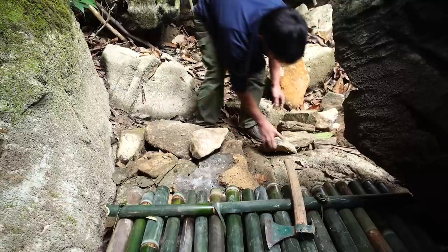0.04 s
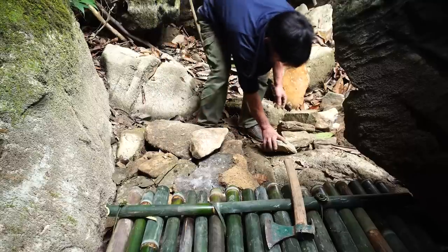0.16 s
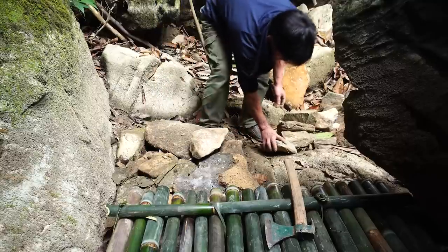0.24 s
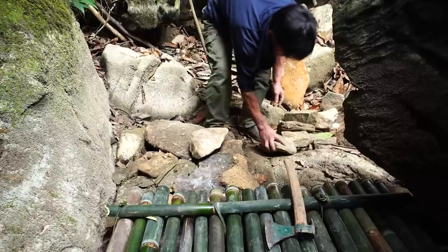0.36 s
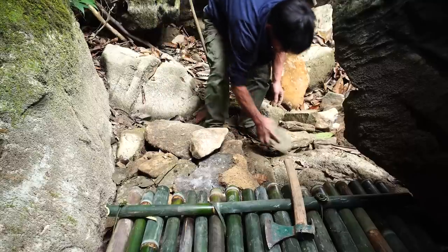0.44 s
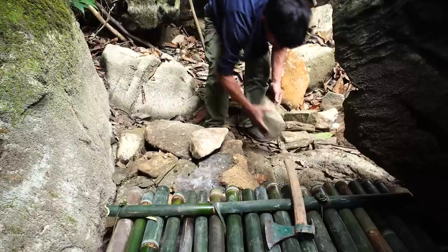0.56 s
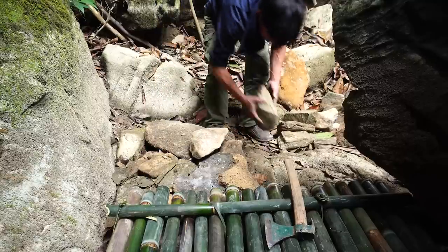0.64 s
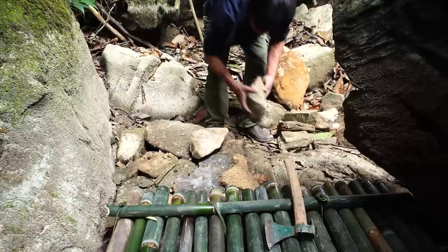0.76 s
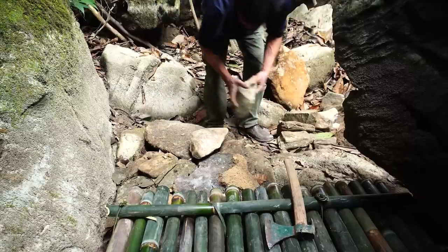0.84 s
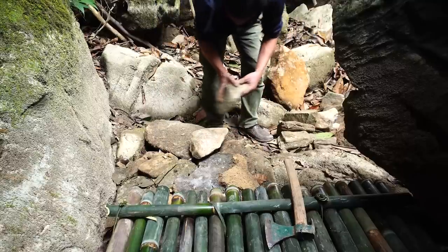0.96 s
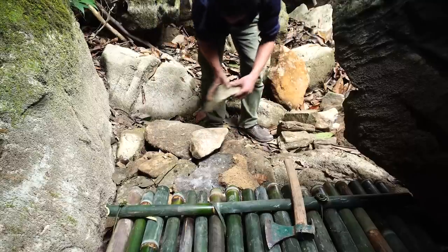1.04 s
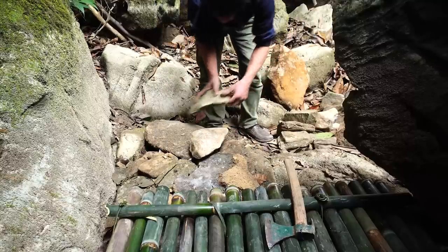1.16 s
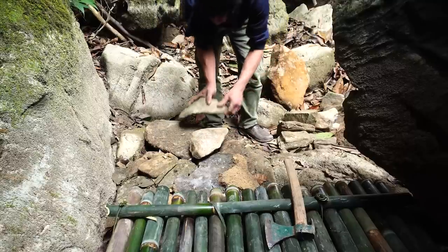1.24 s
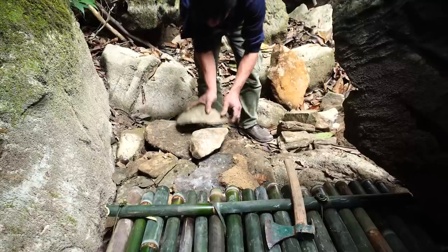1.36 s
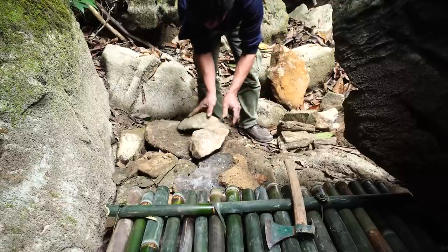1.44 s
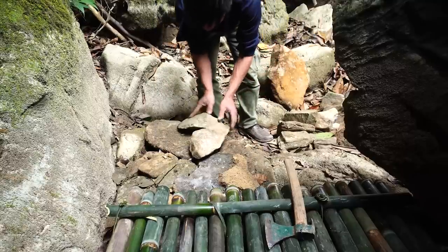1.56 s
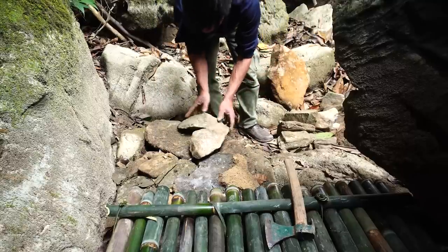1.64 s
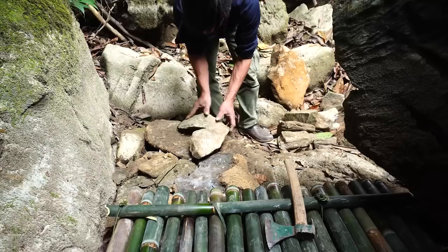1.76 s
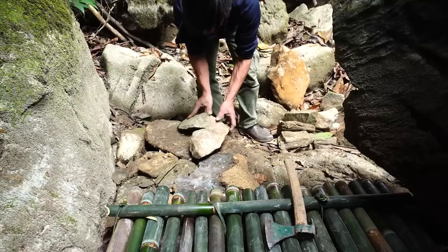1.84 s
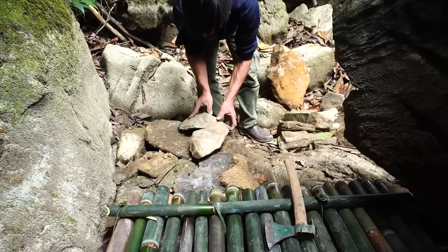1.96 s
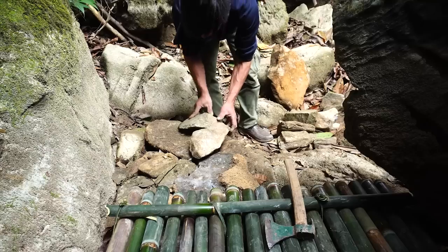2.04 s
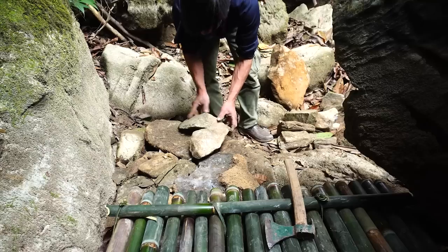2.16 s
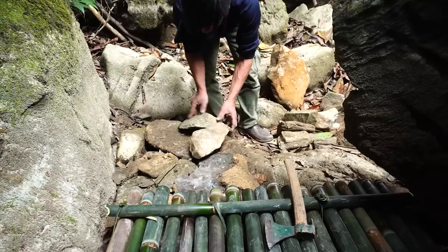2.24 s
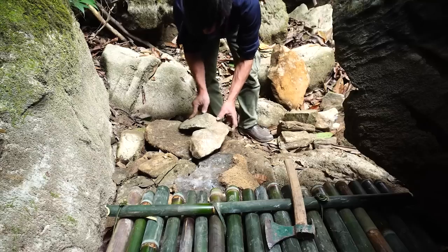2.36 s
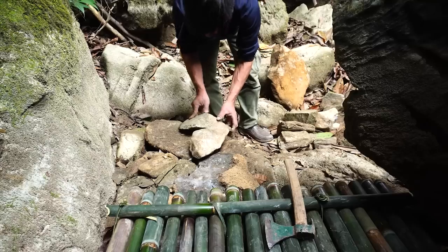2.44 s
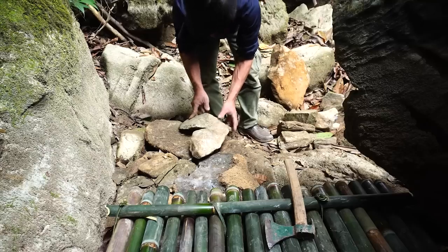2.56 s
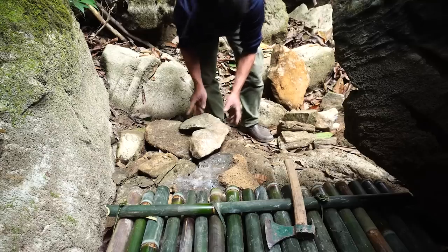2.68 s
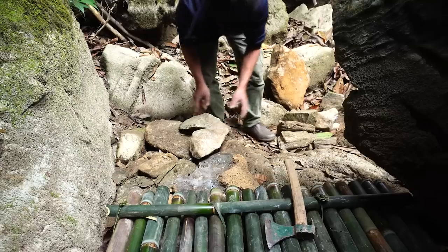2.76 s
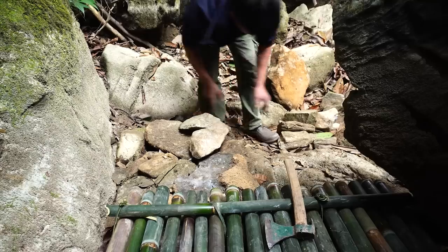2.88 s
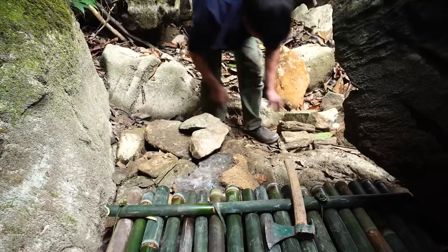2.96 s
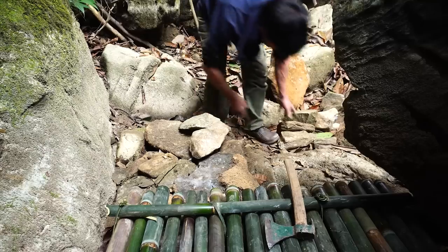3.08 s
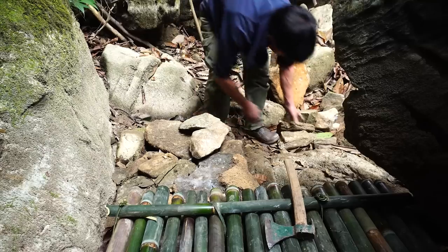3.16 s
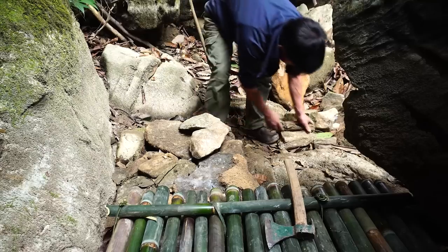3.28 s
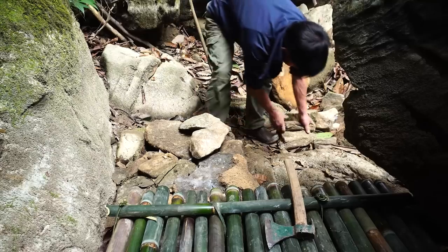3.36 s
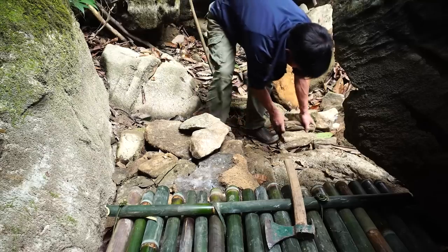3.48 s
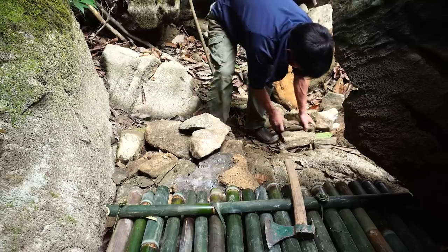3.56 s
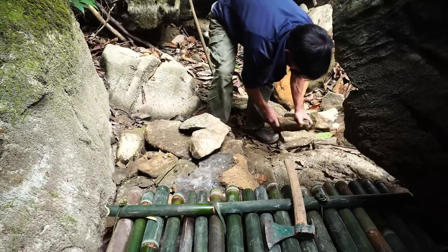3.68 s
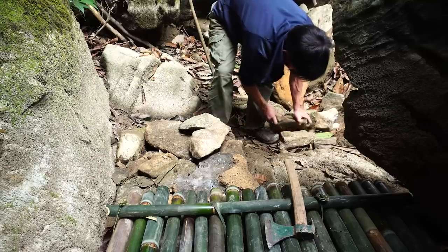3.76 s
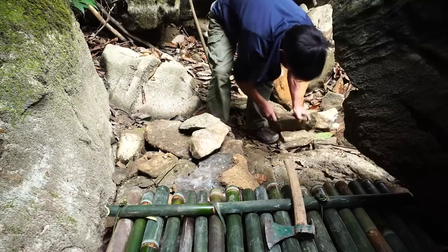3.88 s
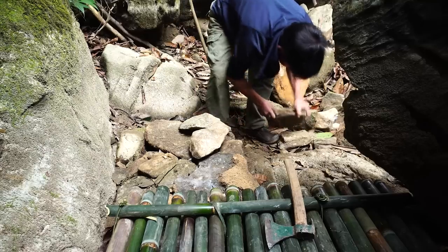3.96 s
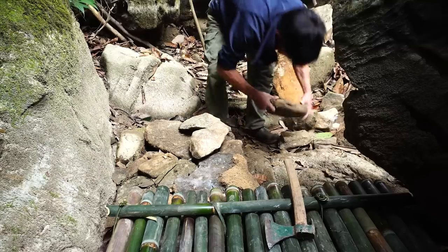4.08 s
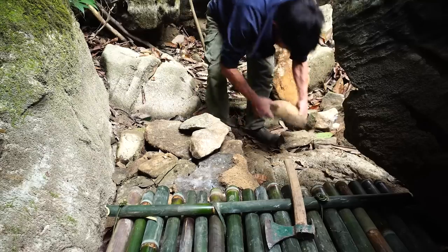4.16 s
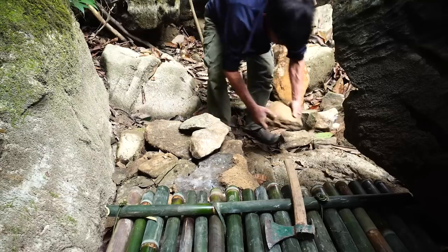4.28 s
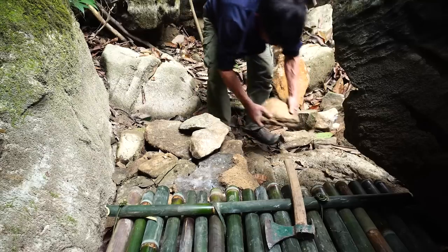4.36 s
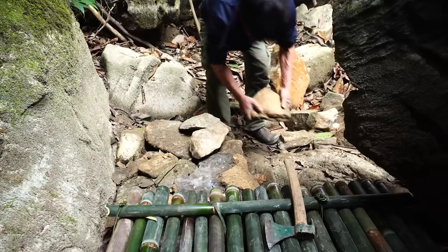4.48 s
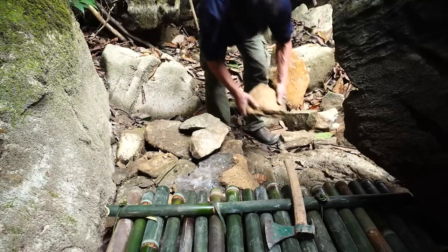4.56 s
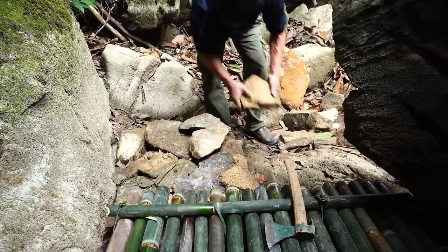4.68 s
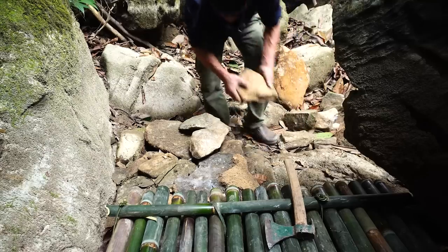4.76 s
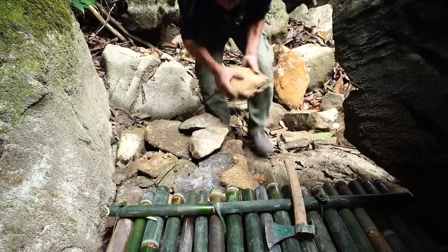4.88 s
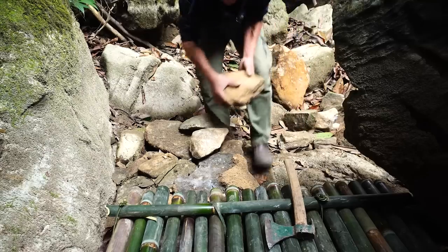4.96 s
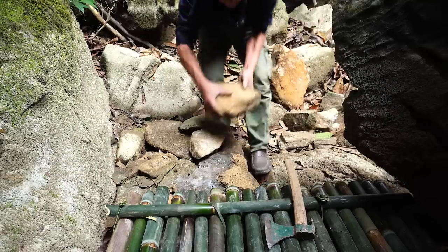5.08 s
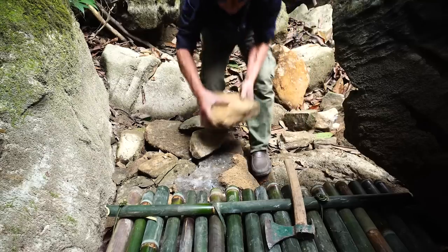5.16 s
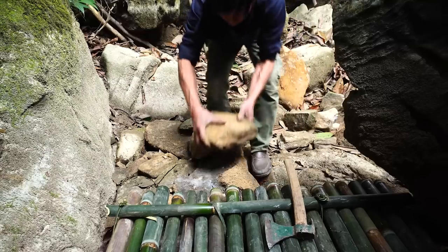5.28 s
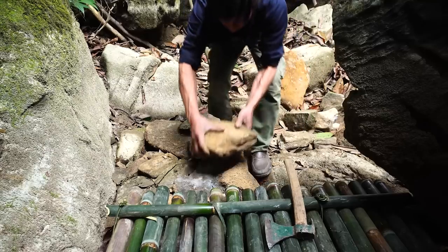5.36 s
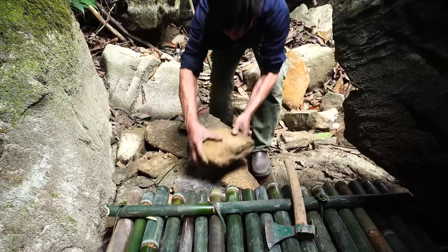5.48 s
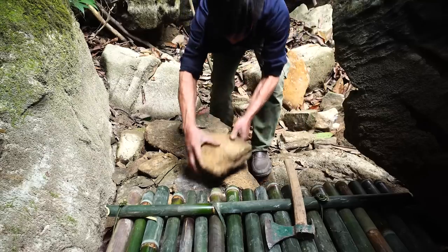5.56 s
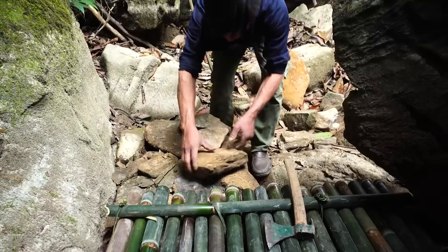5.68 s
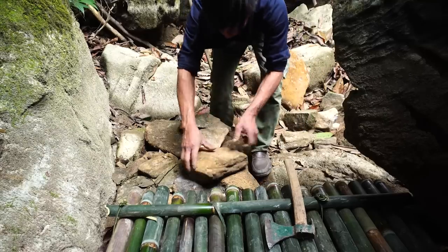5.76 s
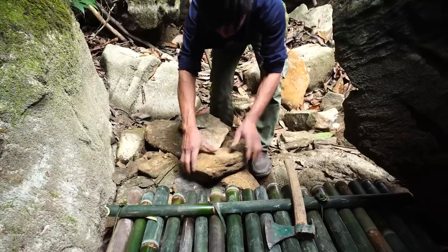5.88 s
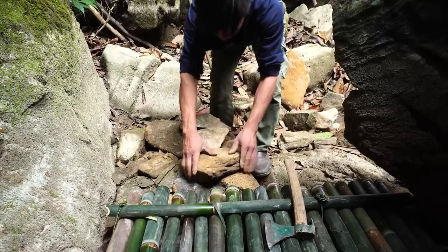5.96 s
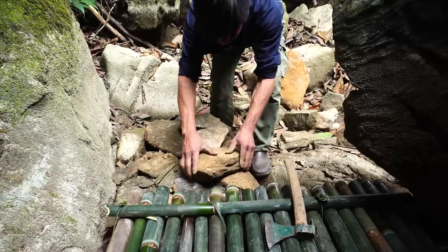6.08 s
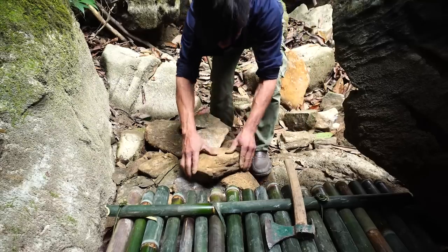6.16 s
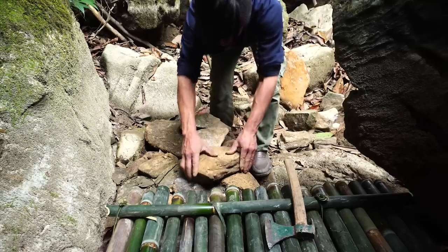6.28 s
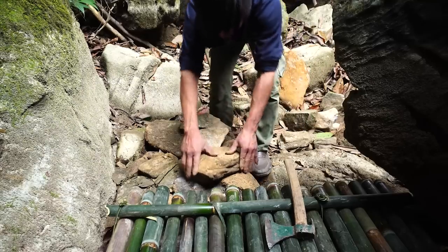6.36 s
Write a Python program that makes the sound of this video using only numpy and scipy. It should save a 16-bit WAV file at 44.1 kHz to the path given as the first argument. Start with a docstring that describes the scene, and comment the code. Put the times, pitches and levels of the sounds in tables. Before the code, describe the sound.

Cicadas buzz steadily in a forest while someone handles rocks, with light scrapes, a sharp knock and a louder clatter.

```python
"""Hands set loose stones down among boulders in a forest. From the start, cicadas drone by clicking
their tiny drums, over a soft forest hiss and feet shuffling in dead leaves. One more cicada joins in,
sweeping upward about every second and a half. Near 1.5 s cloth and leaves brush, grit snaps, and a
stone knocks, rings and thuds as it settles. Light taps and scrapes follow, and near 5.7 s comes the
loudest clatter of stones."""
import sys
import numpy as np
from scipy import signal
from scipy.fft import rfft, irfft, next_fast_len
from scipy.io import wavfile
from scipy.ndimage import uniform_filter1d

SR = 44100
rng = np.random.default_rng(int(sys.argv[2]) if len(sys.argv) > 2 else 0)


def transcribe(u):
    """Save the signal u as a 16-bit wav file named by the first command-line argument.

    u: samples, shape (n,) or (channels, n), limited to [-1, 1]; the rate is SR.
    q: integer samples, one column per channel.
    """
    v = np.clip(np.atleast_2d(u).T, -1, 1)
    q = np.round(v * 32767).astype(np.int16)
    wavfile.write(sys.argv[1], SR, q)


N = 283122


def amp(db):
    return 10 ** (np.asarray(db) / 20)

def unit_rms(x):
    return x / np.sqrt(np.mean(x ** 2) + 1e-20)

def value_at(table, hz):
    row_hz, value = np.transpose(table)
    return np.interp(np.log(hz + 1), np.log(row_hz + 1), value)

def add(mix, start_s, sound):
    part = mix[round(start_s * SR):][:len(sound)]
    part += sound[:len(part)]

def resonate(x, hz, width_hz):
    """Rings x at a steady or gliding pitch: shift that pitch to zero, smooth twice, shift back."""
    turn = np.exp(2j * np.pi * np.cumsum(hz * np.ones(len(x))) / SR)
    r = np.exp(-np.pi * width_hz / SR)
    return 2 * (turn * signal.lfilter([(1 - r) ** 2], [1, -2 * r, r * r], x / turn + 1e-18)).real

def wander(fastest_hz):
    """A slow random curve that strays about 1 either side of zero."""
    t = np.linspace(0, N / SR, 1000)
    waves = zip(np.geomspace(.2, fastest_hz, 12), rng.random(12))
    slow = sum(np.sin(2 * np.pi * (hz * t + phase)) / np.sqrt(hz) for hz, phase in waves)
    return unit_rms(np.interp(np.arange(N) / SR, t, slow))

# Each row: pitch in Hz, how alike left and right are (1 means the same).
LIKENESS = [(60, 0.47), (180, 0.92), (550, 0.048), (1650, 0.81), (4970, 0.17), (15000, 0.16)]
# Each row: pitch in Hz, how far the left wave runs ahead of the right in radians.
LEFT_LEAD = [(0, -0.83), (1380, 1.43), (4390, 0.6), (5770, 1.31), (8960, -1.45), (9730, -0.25),
             (15300, 0.41)]
# Each row: pitch in Hz, how much louder the left is than the right in dB.
LEFT_LOUDER = [(60, 1), (180, -1), (550, 0), (1650, -3.0), (4970, -3), (15000, -5.5)]
def noise(tone, patchy_db):
    """Wide stereo noise, shaped by a tone table, with patches that drift louder and softer."""
    hz = np.fft.rfftfreq(512, 1 / SR)
    a, b, c, d, patches = rng.standard_normal((N // 128 + 5, 257, 5)).T
    patches = unit_rms(uniform_filter1d(uniform_filter1d(patches, 6, 0), 20, 1))
    alike = np.clip(value_at(LIKENESS, hz), 0, 1)[:, None]
    left = a + 1j * b
    right = alike * left + np.sqrt(1 - alike ** 2) * (c + 1j * d)
    right *= np.exp(-1j * value_at(LEFT_LEAD, hz))[:, None]
    tilt = amp(value_at(LEFT_LOUDER, hz) / 2)[:, None]
    bands = np.array([left * tilt, right / tilt]) * amp(value_at(tone, hz)[:, None] + patchy_db * patches)
    return unit_rms(signal.istft(bands, nperseg=512, noverlap=384)[1][:, :N])

def echoes(x, fades):
    """Many small echoes. Each row of fades: pitch in Hz, fade time (seconds to fall 60 dB)."""
    taps = np.zeros((2, 16000))
    slots = np.arange(60, 15960, 20)
    at = slots + rng.integers(0, 20, (2, len(slots)))
    np.put_along_axis(taps, at, rng.choice([-1., 1.], at.shape), 1)
    taps = taps + 1.05 * taps[:1]  # near walls reach both sides alike
    hz, t, bands = signal.stft(taps, SR, nperseg=128)
    tail = signal.istft(bands * amp(-60 * t / value_at(fades, hz)[:, None]), SR, nperseg=128)[1]
    tail /= np.linalg.norm(tail, axis=1, keepdims=True)
    return signal.fftconvolve(x[None], tail, axes=1)[:, :N]

def placed(x, fades, echo_db, louder=LEFT_LOUDER, lead=LEFT_LEAD):
    """A sound and its echoes reach left and right at slightly different levels and times."""
    size = next_fast_len(N + 4096)
    hz, side = np.fft.rfftfreq(size, 1 / SR), np.array([[.5], [-.5]])
    sides = amp(side * value_at(louder, hz)) * np.exp(1j * side * value_at(lead, hz))
    return irfft(rfft(x + amp(echo_db) * echoes(x, fades), size) * sides, size)[:, :N]


# Each row: pitch in Hz, relative level in dB.
FOREST_TONE = [(20, -48), (100, -49), (300, -12), (800, -8), (1700, 1), (3500, -2.5), (7500, -9.5),
               (9000, -7.5), (12000, -12.5), (14000, -15), (15700, -19)]
def forest_hiss():
    """The far forest blends into a soft, even hiss."""
    return amp(-59) * noise(FOREST_TONE, patchy_db=1.2)

# The far crowd. Each row: pitch in Hz, relative level in dB.
CROWD_TONE = [(2350, -63), (4000, -21.5), (4360, -23.5), (4770, -11.5), (4890, -12.5), (5020, -4.5),
              (5540, 0.5), (5800, -10.5), (5840, 0), (6680, -14.5), (7000, -28.5), (7500, -21.5),
              (9750, -56), (16500, -120)]
# The near cicadas. Each row: drum pitch in Hz, width of its ring in Hz, level in dB.
NEAR_CICADAS = [(5444, 280, -52.5), (5626, 370, -47.5), (5920, 840, -54.5), (5227, 435, -52.5),
                (5550, 430, -62)]
# Each entry: clicks per second of one near cicada, in the same order.
CLICK_RATES = [63.62, 63.36, 97.66, 127.9, 228.7]
def cicadas():
    """Each drum buckles in quick clicks and rings; trees smear the song; the far crowd blurs to noise."""
    out = amp(-45.5 + .35 * wander(2.6)) * noise(CROWD_TONE, patchy_db=.9)
    for per_s, (hz, width_hz, db) in zip(CLICK_RATES, NEAR_CICADAS):
        count = np.cumsum(per_s * (1 + .0008 * wander(3))) / SR + rng.random()
        clicks = np.diff(np.floor(count), prepend=0) * (1 + 0.3 * rng.standard_normal(N))
        song = placed(resonate(clicks, hz, width_hz), fades=[(4000, 0.4), (7000, 0.26)], echo_db=2.3)
        out += amp(db + 1.02 * wander(7)) * unit_rms(song)
    return out

# Each row: pitch in Hz, relative level in dB.
SHUFFLE_TONE = [(88, -80), (150, -54), (387, -27), (456, -19.5), (617, -12.5), (1450, -5), (2580, -7),
                (4000, -14.5), (5200, -25), (8800, -120)]
# Each row: time in seconds, level in dB.
SHUFFLE_LEVELS = [(0.0, -59.5), (1.2, -61), (1.5, -52), (1.84, -62.5), (2.91, -54.5), (3.11, -59),
                  (3.9, -60), (4.42, -56), (4.61, -58.5), (5.69, -62), (5.79, -55.5), (6.2, -61.5),
                  (6.42, -55.5)]
def shuffling_feet():
    """Feet stir dead leaves into a low rustle that swells and sinks."""
    level_db = np.interp(np.arange(N) / SR, *np.transpose(SHUFFLE_LEVELS))
    return amp(level_db) * noise(SHUFFLE_TONE, patchy_db=2.5)

# Each row: start in seconds, length in seconds, level in dB, starting pitch in Hz.
RISING_CALLS = [(0.224, 0.71, -55.5, 3870), (1.552, .67, -54.5, 3940), (2.96, 0.71, -54, 3870),
                (4.268, 0.81, -55, 4080), (5.783, .62, -55, 4000)]
def rising_cicada(clicks_per_s=1600, end_hz=5200):
    """Uneven clicks rasp on a drum that tightens through each call, so the pitch rises."""
    out = np.zeros(N)
    for start, length, db, start_hz in RISING_CALLS:
        size = round(length * SR)
        clicks = (rng.random(size) < clicks_per_s / SR) * (1 + 0.092 * rng.standard_normal(size))
        progress = np.linspace(0, 1, size)
        hz = start_hz + (end_hz - start_hz) * progress ** 1.28  # slowly at first
        call = unit_rms(resonate(clicks, hz, width_hz=820))
        add(out, start, amp(db) * call * abs(np.sin(np.pi * progress)) ** 0.45)
    return placed(out, fades=[(4000, 0.098), (7000, 0.42)], echo_db=1.5)

# Brushed cloth and leaves. Each row: pitch in Hz, relative level in dB.
BRUSH_TONE = [(1500, -41), (2500, -18), (4000, -8.5), (7500, -13), (10000, -14), (13000, -22.5),
              (15700, -18)]
# Scraped grit. Each row: pitch in Hz, relative level in dB.
SCRAPE_TONE = [(300, -27), (800, -4.5), (1500, 1), (2600, -1.5), (3800, -6.5), (5500, -30)]
# Each row: start in seconds, length in seconds, brush level in dB, scrape level in dB.
STROKES = [(1.468, 0.066, -58, -71), (1.964, 0.24, -78, -56.5), (2.48, 0.2, -80, -59),
           (2.742, 0.2, -54, -55.5), (3.056, 0.12, -63, -66), (3.586, 0.17, -63, -59),
           (3.717, 0.21, -55, -60.5), (4.153, 0.17, -58, -58), (4.24, 0.41, -66, -66.5),
           (4.738, 0.15, -59.5, -76), (4.86, 0.32, -59, -76), (5.634, 0.15, -56, -53.5),
           (5.805, 0.053, -78, -45), (6.219, 0.15, -80, -58.5)]
def brushes_and_scrapes(grains_per_s=400):
    """Hands and feet rub cloth, leaves and grit: strokes of noise, roughened by small grains."""
    grain_sizes = amp(3.0 * np.minimum(rng.exponential(1, N), 3))
    grains = uniform_filter1d(grain_sizes * (rng.random(N) < grains_per_s / SR), 60)
    rough = unit_rms(1 + 0.17 * unit_rms(grains))
    brushing, scraping = np.zeros(N), np.zeros(N)
    for start, length, brush_db, scrape_db in STROKES:
        stroke = signal.windows.tukey(round(length * SR), .6)
        add(brushing, start, amp(brush_db) * stroke)
        add(scraping, start, amp(scrape_db) * stroke)
    return rough * (brushing * noise(BRUSH_TONE, 1.5) + scraping * noise(SCRAPE_TONE, 2.0))

# The echo among the boulders. Each row: pitch in Hz, fade time in seconds.
BOULDER_FADES = [(100, 0.4), (400, 0.14), (800, .09), (1500, 0.075), (5000, 0.13)]
# Each row: start in seconds, level in dB, pitch in Hz, fade time in seconds.
SNAPS = [(1.494, -44, 8000, .003), (1.502, -38, 8870, 0.03), (4.312, -54, 9000, .003),
         (4.381, -46, 7560, .005), (4.451, -43, 9450, 0.0055), (4.4907, -40.5, 8240, 0.0042),
         (4.5496, -50, 8500, .003), (5.059, -34, 4520, 0.0069), (5.6803, -28, 7870, 0.0038),
         (5.679, -30.5, 4100, 0.0058), (5.715, -44, 4700, .003), (5.736, -42, 4500, .003)]
def snaps(puff_fade_s=0.02, brittle_s=0.0065):
    """Grit or a twig snaps: one high ring in a puff of noise."""
    out, t = np.zeros(N), np.arange(2000) / SR
    for start, db, hz, fade_s in SNAPS:
        ring = amp(-60 * t / fade_s) * np.sin(2 * np.pi * hz * t)
        puff = np.diff(rng.standard_normal(len(t) + 1)) * amp(0.5 - 60 * t / puff_fade_s)
        puff /= 1 + (fade_s / brittle_s) ** 2  # what rings longer crumbles less
        add(out, start, amp(db) * (ring + resonate(puff, hz, width_hz=4500)))
    return placed(out, BOULDER_FADES, echo_db=-9.5)

# The notes a stone rings with. Each row: multiple of its main pitch, relative level in dB.
STONE_NOTES = [(0.421, -8), (.62, 2), (.8, -8), (1.002, 21), (1.17, 8), (1.34, 16.5), (1.63, 11.5),
               (1.85, -5), (2.15, -40), (2.9, -29), (3.4, 3), (4.0, 17), (4.7, 6), (5.4, -24)]
# Each row: start in seconds, level in dB, main pitch in Hz, pitch in Hz above which the blow
# drives little, fade time of the main pitch in seconds.
STONE_KNOCKS = [(1.4943, -12, 816, 4100, 0.045), (1.503, -25.5, 772, 2200, 0.038),
                (1.5049, -22, 860, 2600, 0.014), (1.537, -27.5, 473, 910, 0.013),
                (1.547, -51, 450, 900, 0.014), (1.697, -47, 690, 1500, 0.022),
                (2.069, -41.5, 1160, 2500, .018), (2.748, -43, 1090, 1130, 0.024),
                (2.817, -32.5, 2760, 3200, 0.016), (4.047, -52, 690, 810, 0.047),
                (4.079, -50, 670, 790, .035), (4.45, -36, 1750, 3850, 0.011),
                (4.492, -38, 1320, 3750, 0.0074), (5.056, -32, 1790, 5000, 0.013),
                (5.074, -42.5, 720, 1500, 0.033), (5.154, -49.5, 605, 1300, 0.032),
                (5.259, -43, 780, 1210, 0.022), (5.681, -15.5, 1160, 2600, .007),
                (5.699, -7.5, 965, 2290, 0.013), (5.701, -13.5, 566, 1780, 0.034),
                (5.7177, -16, 2360, 2700, .009), (5.721, -17.5, 755, 1270, 0.031),
                (5.734, -27, 2660, 4000, .012), (5.74, -14.5, 804, 1400, 0.022),
                (5.8307, -15, 775, 3030, 0.011), (5.8331, -11.5, 716, 3960, 0.025),
                (5.933, -42, 2460, 2940, 0.02), (5.941, -40, 1000, 1490, 0.013)]
# Single echoes off the nearest rocks. Each row: delay in seconds, level in dB.
ROCK_ECHOES = [(.0031, -7), (.0058, -13), (.0095, -10)]
# Each row: pitch in Hz, how much louder the stones are on the left in dB.
PILE_LOUDER = [(60, -2), (180, 0.5), (550, -2), (1650, -6), (4970, -3.5), (15000, -11)]
# Each row: pitch in Hz, how far their left wave runs ahead in radians.
PILE_LEAD = [(60, .15), (200, 0.46), (500, 0.61), (1000, 1.23), (2000, 0.65), (5800, 1.4), (15000, .2)]
def stone_knocks(detune=.025, crunch_fade_s=0.0076):
    """Stone hits stone: each blow rings several notes at once and crushes some grit."""
    out, t = np.zeros(N), np.arange(4000) / SR
    multiple, note_db = np.transpose(STONE_NOTES)[:, :, None]
    onset = 1 - np.exp(-(t / 0.00036) ** 2)
    for start, db, hz, top_hz, fade_s in STONE_KNOCKS:
        notes_hz = multiple * hz * (1 + detune * rng.standard_normal(multiple.shape))
        reach = 1 / (1 + (notes_hz / top_hz) ** 6)  # a soft contact cannot drive the high notes
        faded_db = 60 * t * multiple ** 1.7 / fade_s  # higher notes die faster
        ring = (reach * amp(note_db - faded_db) * np.sin(2 * np.pi * notes_hz * t)).sum(axis=0)
        grit = np.gradient(rng.standard_normal(len(t)))
        grit = resonate(resonate(grit, 0.62 * top_hz, 0.7 * top_hz), 0.54 * top_hz, 1.28 * top_hz)
        # A harder contact crushes more grit, but the crunch grows only 0.49 dB per dB of blow.
        crunch_db = -25.5 + 5 * np.log2(top_hz / 1960) + (0.49 - 1) * db
        crunch = amp(crunch_db - 60 * t / crunch_fade_s) * unit_rms(grit)
        blow = amp(db) * (ring / abs(ring).max() + crunch) * onset
        low_cut = signal.butter(2, 0.31 * hz, "high", fs=SR)  # a stone sends out little bass
        add(out, start, signal.lfilter(*low_cut, blow))
    out += sum(amp(db) * np.roll(out, round(delay * SR)) for delay, db in ROCK_ECHOES)
    return placed(out, BOULDER_FADES, echo_db=-7.5, louder=PILE_LOUDER, lead=PILE_LEAD)

# Each row: pitch in Hz, relative level in dB, fade time in seconds.
GROUND_NOTES = [(84.6, -4, .07), (154, -5.5, 0.072), (199, 3, 0.033)]
# Each row: start in seconds, level in dB.
THUDS = [(1.494, -47), (1.539, -33), (2.075, -50), (5.703, -29), (5.739, -35), (5.833, -44), (5.933, -51),
         (6.091, -58)]
def ground_thuds(rise_s=0.012):
    """A stone's weight settles and pushes the ground, which answers with a few low notes."""
    out, t = np.zeros(N), np.arange(4000) / SR
    thud = sum(amp(db - 60 * t / fade_s) * np.sin(2 * np.pi * hz * t) for hz, db, fade_s in GROUND_NOTES)
    thud *= (1 - np.exp(-t / rise_s)) ** 2
    for start, db in THUDS:
        add(out, start, amp(db) * thud)
    return out


def scene():
    background = forest_hiss() + cicadas() + shuffling_feet() + rising_cicada()
    return background + brushes_and_scrapes() + snaps() + stone_knocks() + ground_thuds()

def record(dry):
    """The microphone cuts the bass below 88 Hz; then the treble above 15660 Hz is removed."""
    thin = signal.sosfilt(signal.butter(4, 88, "high", fs=SR, output="sos"), dry)
    treble_cut = signal.firwin(511, 15660, window=("kaiser", 9), fs=SR)
    return signal.oaconvolve(thin, treble_cut[None], "same")


dry = scene()
out = record(dry)
transcribe(out)
```